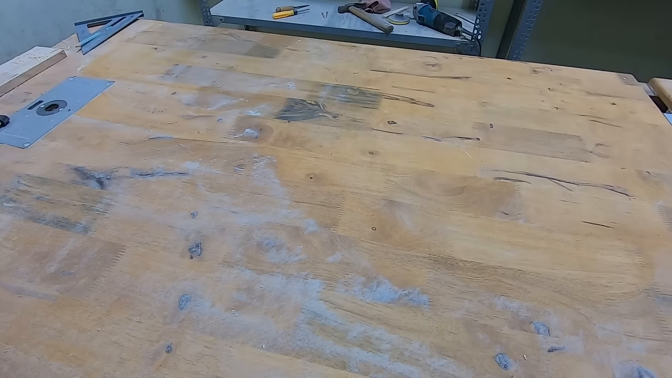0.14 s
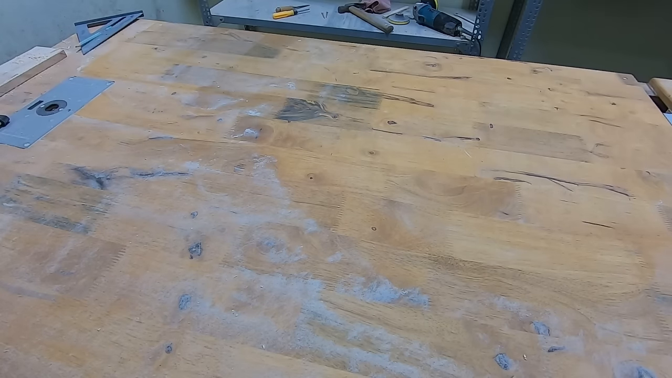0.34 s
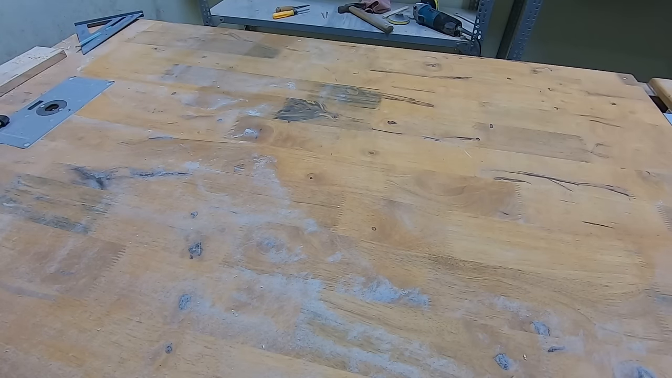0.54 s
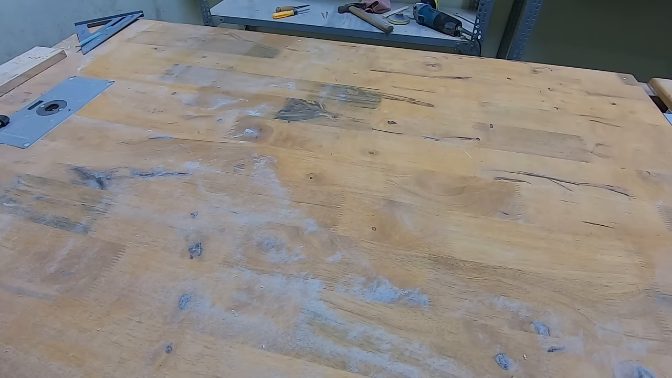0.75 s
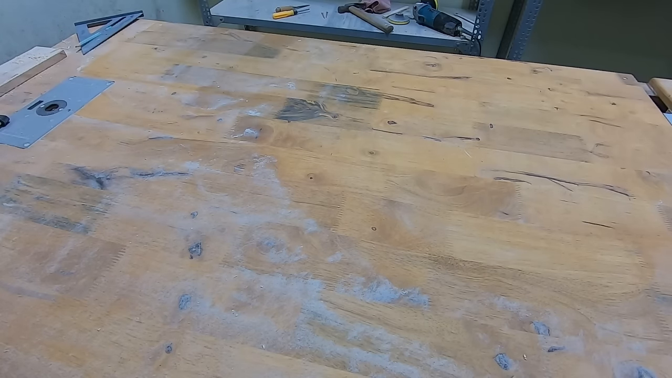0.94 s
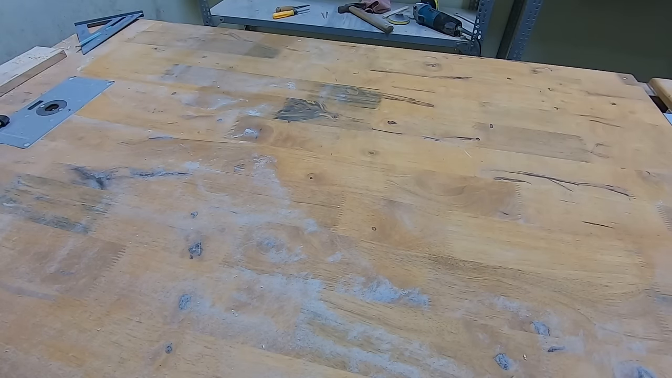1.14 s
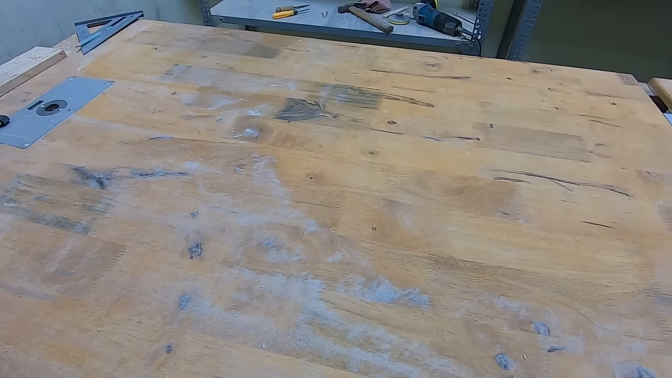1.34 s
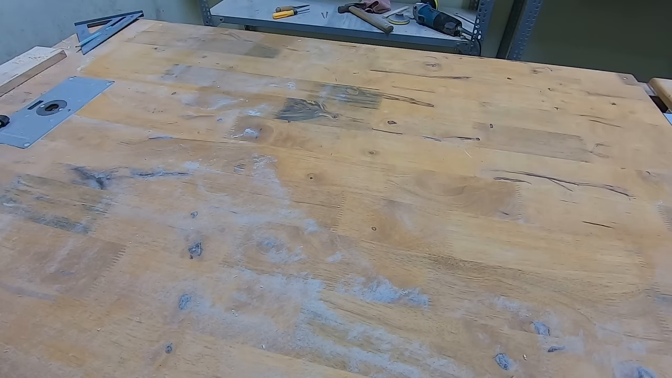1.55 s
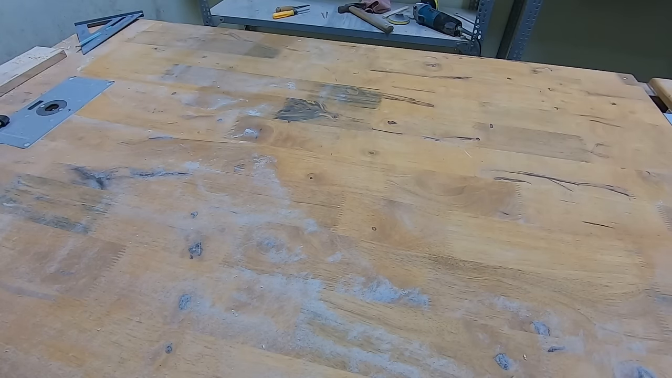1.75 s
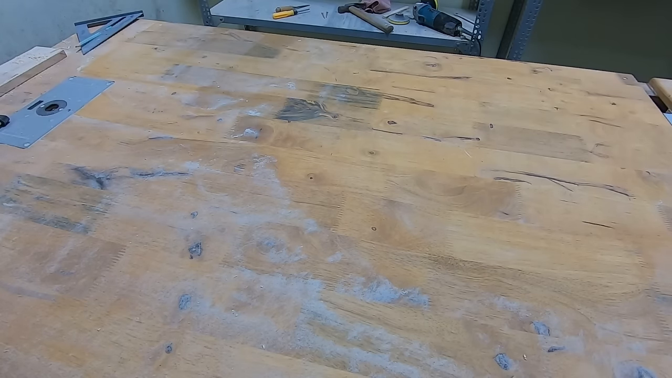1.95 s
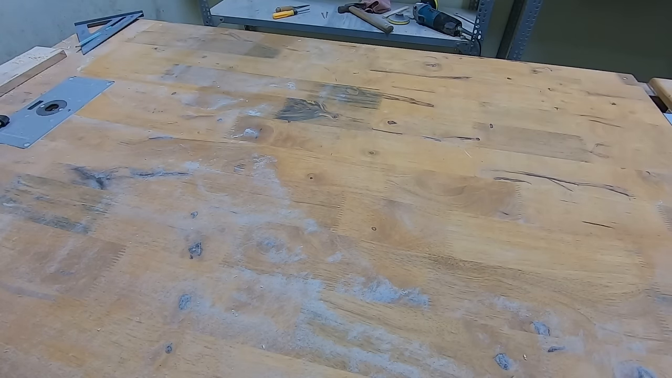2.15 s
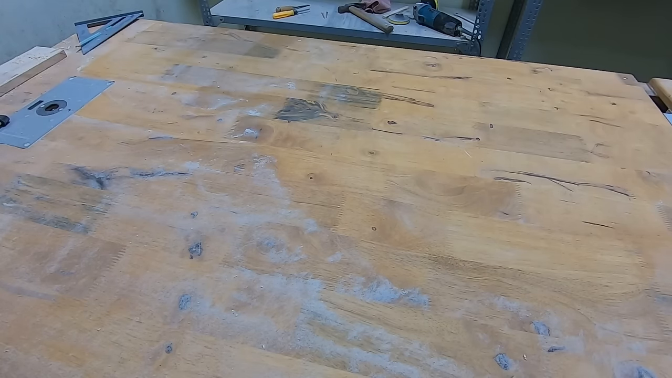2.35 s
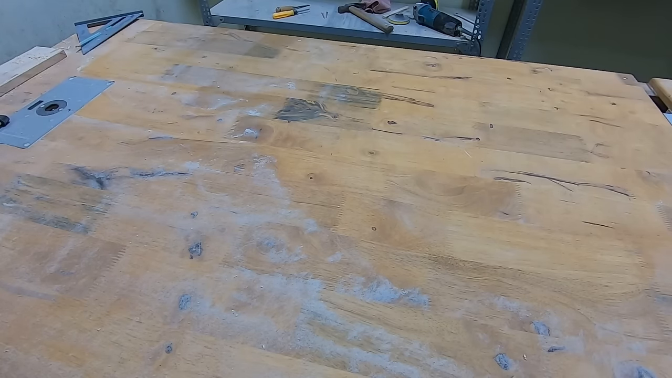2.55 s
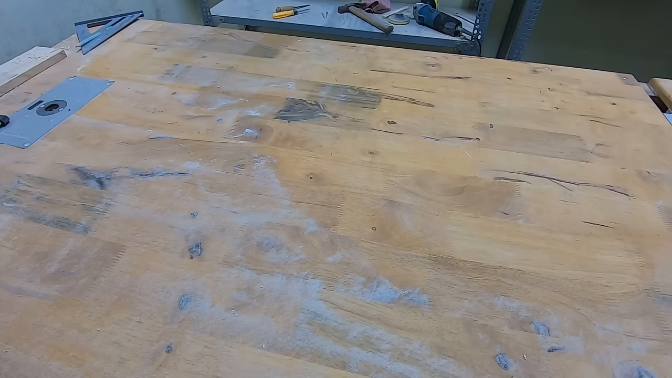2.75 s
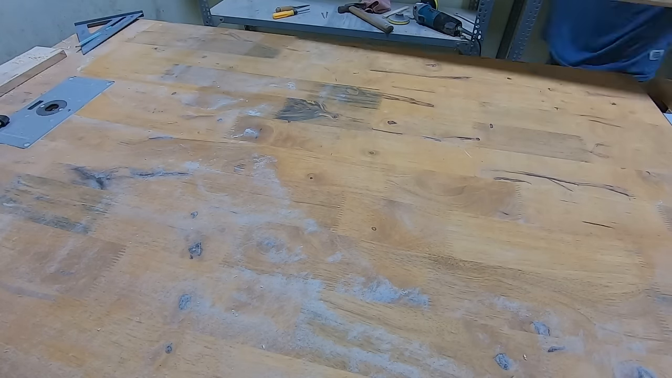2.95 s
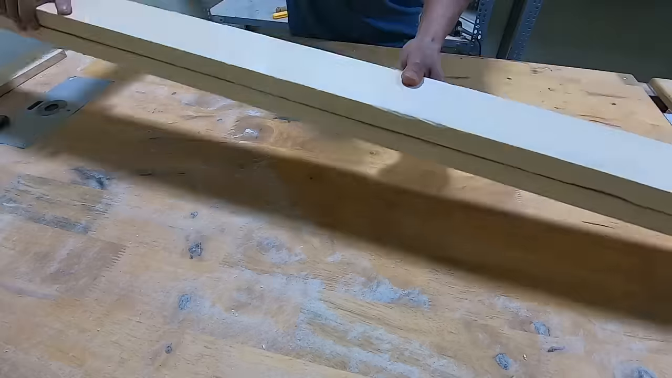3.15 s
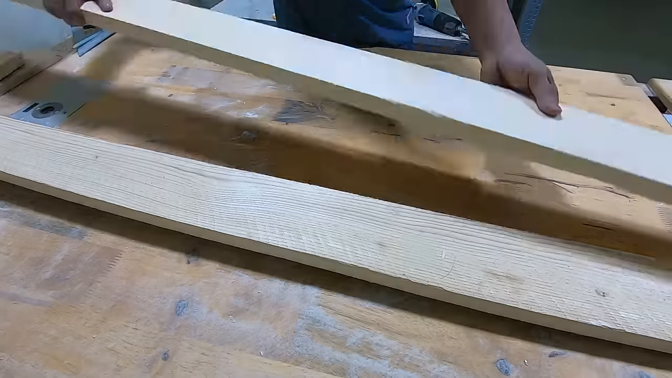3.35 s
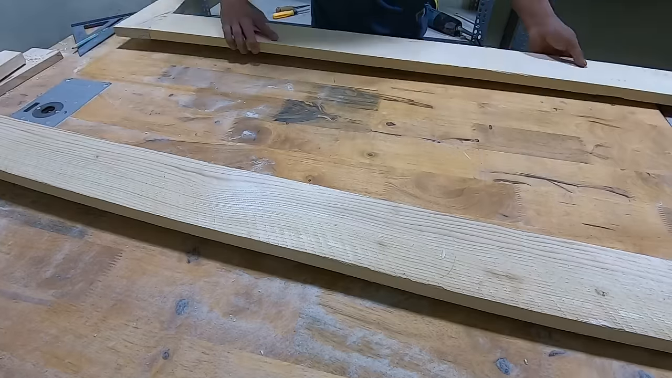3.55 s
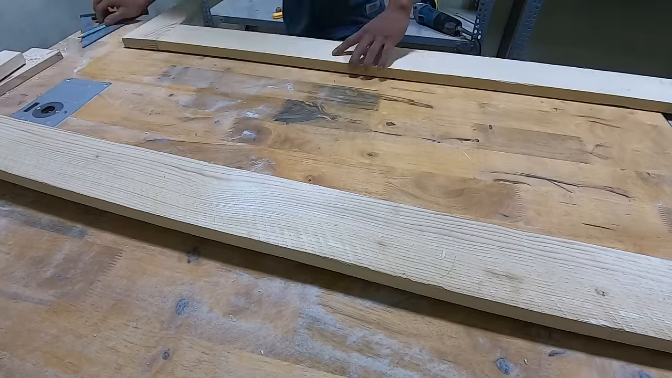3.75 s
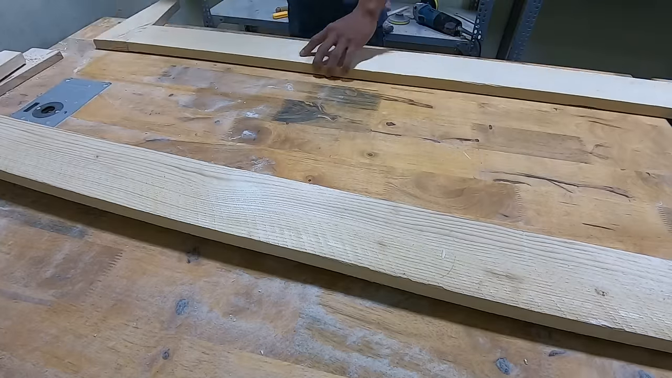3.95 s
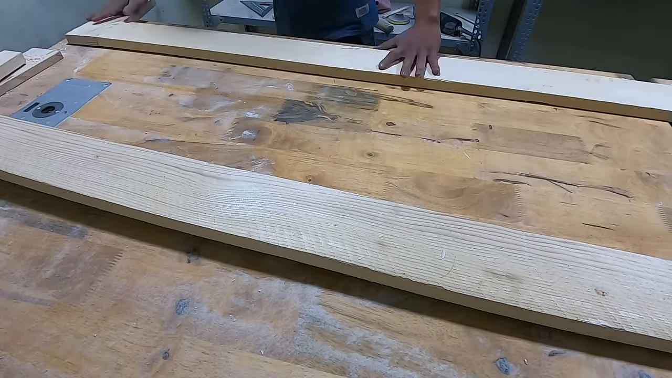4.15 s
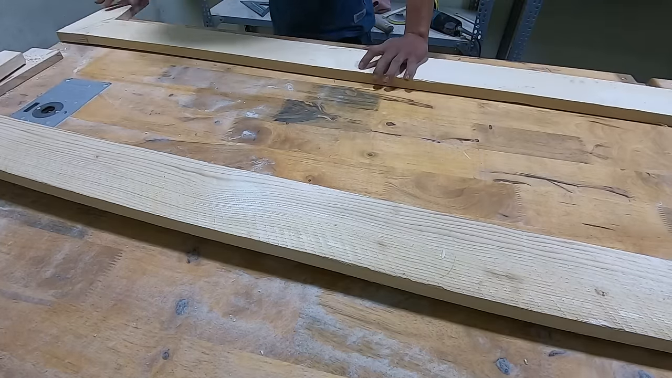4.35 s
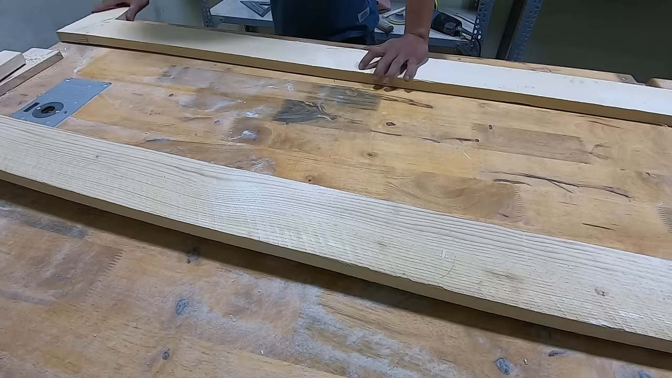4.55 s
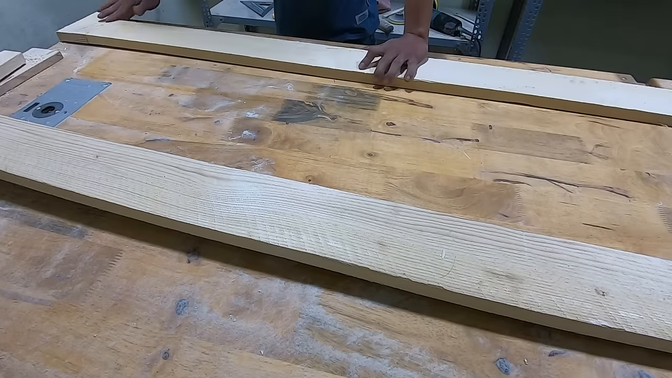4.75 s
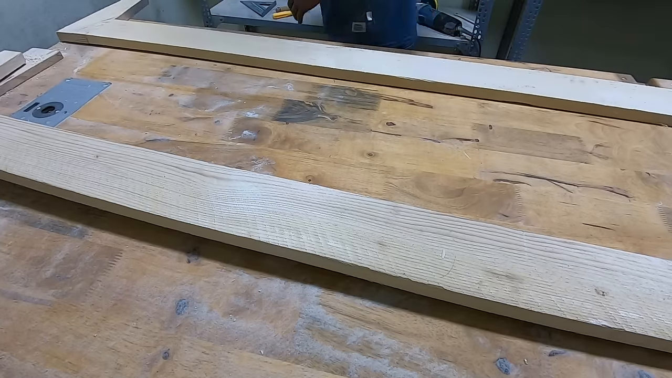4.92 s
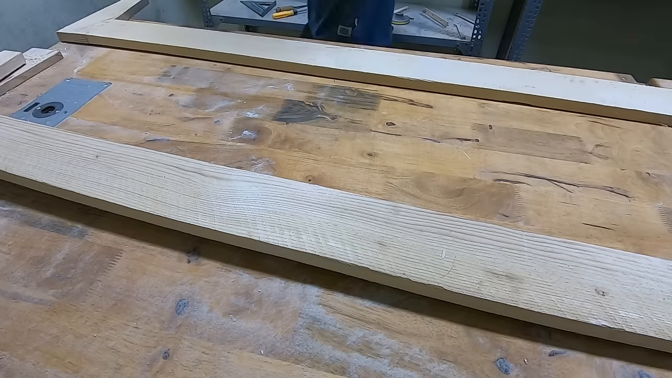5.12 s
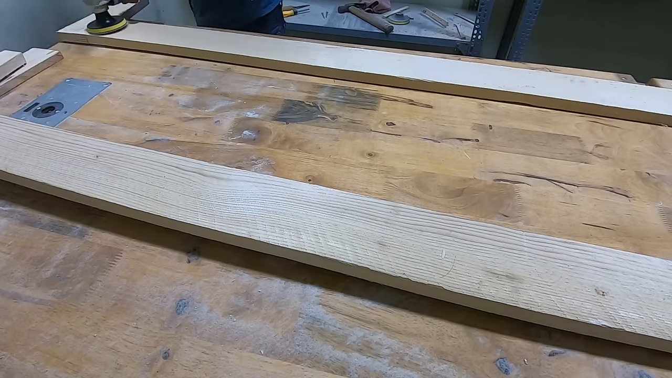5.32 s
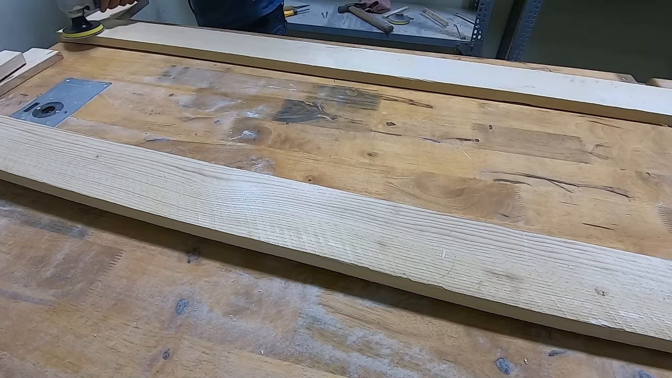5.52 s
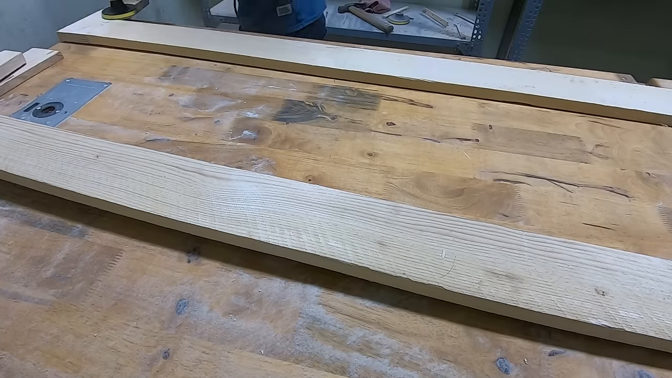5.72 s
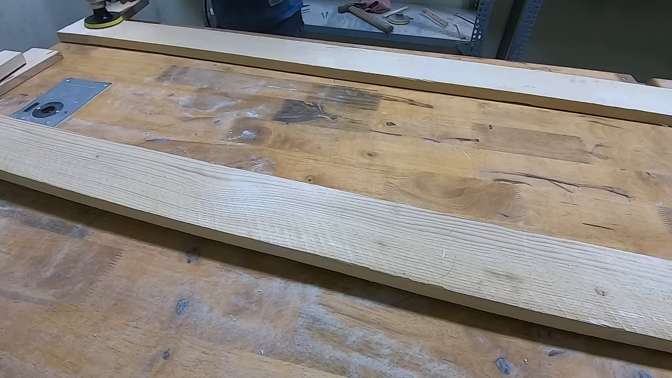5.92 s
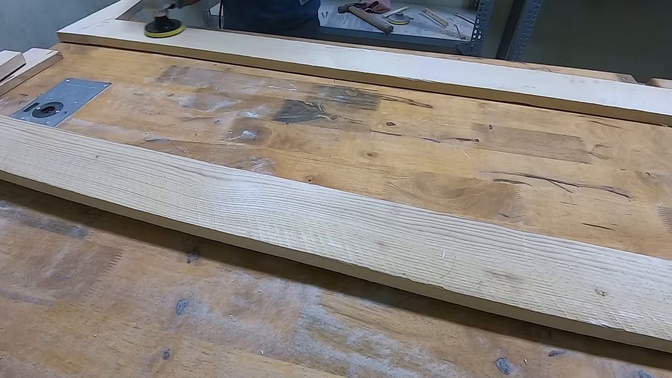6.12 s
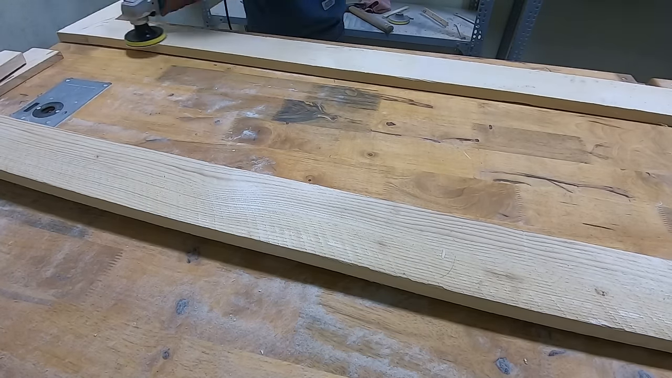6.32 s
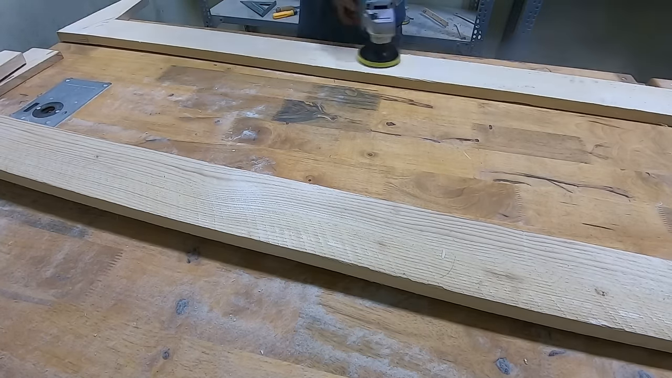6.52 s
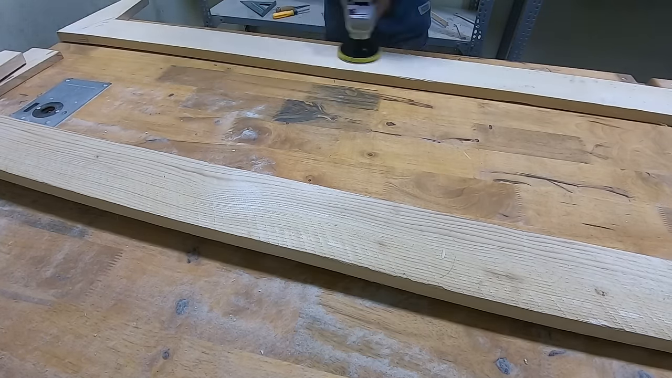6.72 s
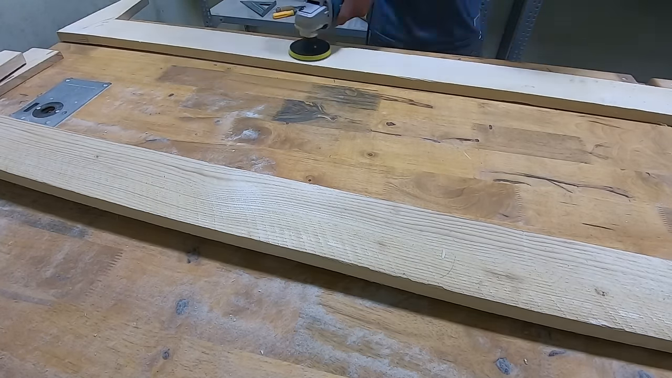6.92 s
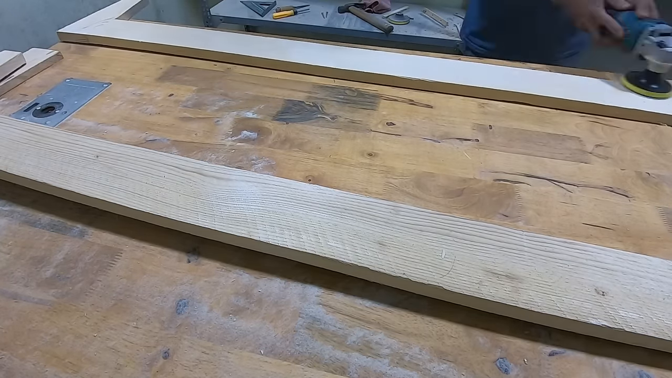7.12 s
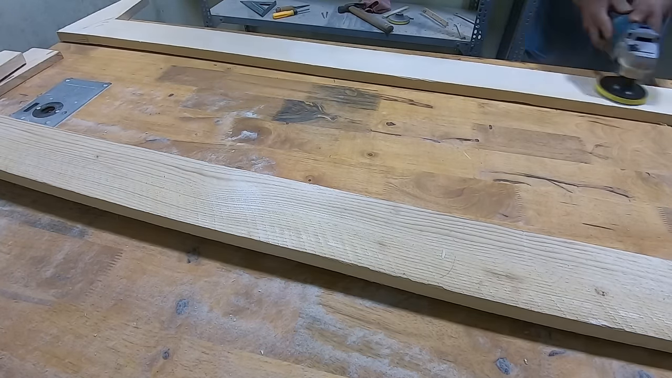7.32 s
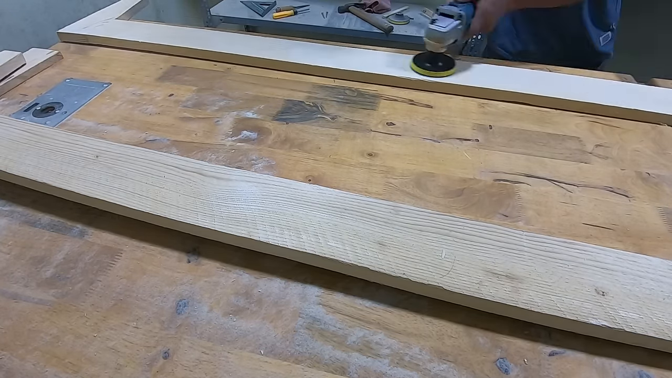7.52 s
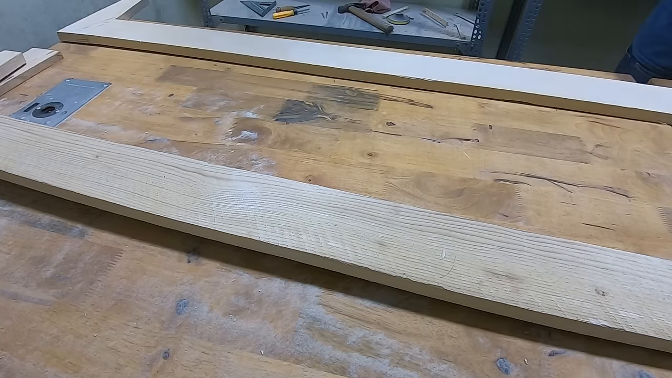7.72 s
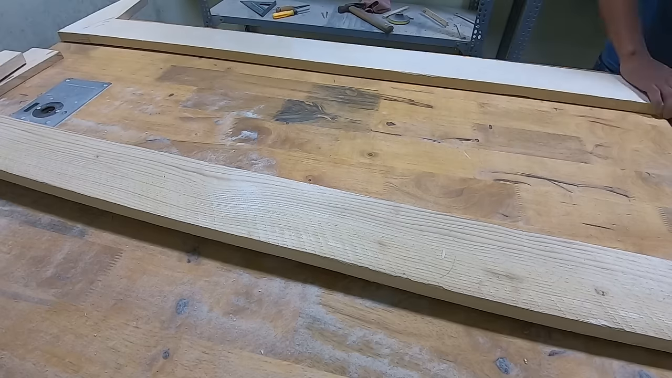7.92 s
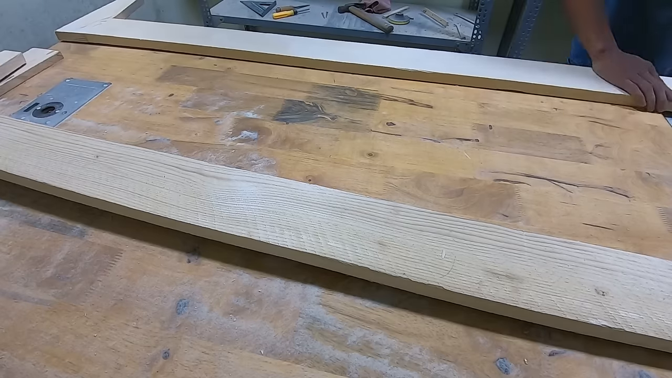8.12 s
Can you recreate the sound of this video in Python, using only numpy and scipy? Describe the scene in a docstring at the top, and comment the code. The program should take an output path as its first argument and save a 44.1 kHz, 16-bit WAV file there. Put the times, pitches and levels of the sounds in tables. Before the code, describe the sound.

In a small workshop heard in fast motion, tools land and drag on a steel shelf with bright, splashy clanks while feet patter quickly. Wooden boards then slide and knock onto a bench with hard, ringing raps. After a brief lull an electric disc sander starts with a puff of air, dips once, and whines gritty and high until the end. Close stereo microphones, short room resonance.

```python
"""Tools clatter on a steel shelf in a small workshop in fast motion, everything quick and high-pitched.
Each blow is a burst of noise through the steel's resonances; feet patter and ring the room's fixed low modes.
Boards knock together on the bench as ringing wood; then a disc sander starts, bogs down once and whines
along a board: a pitched shaft with overtones, rushing air, grit and a shaken bench.
Heard at two close microphone ports that differ in level, phase and how alike their noise is."""
import sys
import numpy as np
from scipy import signal
from scipy.fft import rfft, irfft, next_fast_len
from scipy.io import wavfile
from scipy.ndimage import uniform_filter1d, map_coordinates

SR = 44100
rng = np.random.default_rng(int(sys.argv[2]) if len(sys.argv) > 2 else 0)


def generate_wav(signal):
    """Clip the signal to [-1, 1] and save it as 16-bit WAV at the path in sys.argv[1]."""
    frames = np.transpose(np.atleast_2d(signal))
    scaled = np.clip(frames, -1, 1) * 32767
    pcm = np.round(scaled).astype(np.int16)
    wavfile.write(sys.argv[1], SR, pcm)


N = 360297  # samples, about 8.2 s


def amp(db):
    """Amplitude ratio of a level in dB."""
    return 10 ** (np.asarray(db) / 20)


def unit(x):
    """x scaled to an rms of 1."""
    return x / np.sqrt(np.mean(np.abs(x) ** 2) + 1e-20)


def along(points, hz):
    """Read (freq_hz, value) points on a log frequency axis."""
    point_hz, value = np.transpose(points)
    return np.interp(np.log(hz + 1), np.log(point_hz + 1), value)


def curves(rows):
    """One value per sample for each column after the time; the end values hold."""
    s, *columns = np.transpose(rows)
    return [np.interp(np.arange(N) / SR, s, column) for column in columns]


def wobble(rate):
    """A smooth random curve, rate knots a second."""
    knots = rng.standard_normal(int(N * rate / SR) + 4)
    return map_coordinates(knots, [np.arange(N) * rate / SR])


def filtered(x, response):
    """x times a complex response of frequency."""
    size = next_fast_len(N + SR // 8, True)
    hz = np.fft.rfftfreq(size, 1 / SR)
    return irfft(rfft(x, size) * response(hz), size)[..., :N]


def shaped(spectrum):
    """Response read from (freq_hz, level_db) points."""
    return lambda hz: amp(along(spectrum, hz))


def resonant(peaks):
    """Response of (freq_hz, width_hz, level_db) resonances, added with alternating sign."""
    def response(hz):
        total = 0
        for k, (peak_hz, width_hz, db) in enumerate(peaks):
            band = 1j * hz * width_hz
            total = total + (-1) ** k * amp(db) * band / (peak_hz ** 2 - hz ** 2 + band)
        return total
    return response


def patched(pair, depth_db, size, wide, long):
    """Random gain in patches, wide bins by long frames of a size-sample window."""
    z = signal.stft(pair, nperseg=size)[2]
    field = rng.standard_normal(z.shape[1:])
    field = uniform_filter1d(field, size=wide, axis=0)
    field = uniform_filter1d(field, size=long, axis=1)
    return signal.istft(z * amp(depth_db * unit(field)), nperseg=size)[1][:, :N]


# How alike noise is at the two ports: freq_hz, likeness (1 = identical)
LIKENESS = [(60, .7), (150, 0.6), (300, 0.48), (600, 0.94), (1200, 0.97), (2400, 1), (4000, 0.78),
            (6000, 0.16), (15000, 0.17)]


def noise(response, patchy_db=0, streaky_db=0):
    """Stereo noise, mid rms 1: broad patches of gain, and streaks where room reflections add up for a moment."""
    pair = rng.standard_normal((2, N))
    if patchy_db:
        pair = patched(pair, patchy_db, size=256, wide=2, long=10)
    if streaky_db:
        pair = patched(pair, streaky_db, size=1024, wide=2, long=14)

    def mid_and_side(hz):
        turn = np.arccos(np.clip(along(LIKENESS, hz), -1, 1)) / 2
        return response(hz) * np.array([np.cos(turn), np.sin(turn)])

    mid, side = filtered(pair, mid_and_side)
    return np.array([mid + side, mid - side]) / np.std(mid)


def bursts(times, db, t60, rise, crack_db=-30):
    """Envelope of blows, summed as power: a crack, a quick rise, then the room's decay."""
    power, t = np.zeros(N + SR), np.arange(SR // 3) / SR
    crack = amp(crack_db) * t / 0.00068 * np.exp(1 - t / 0.00063)
    for s, level_db, fall_s, rise_s in zip(times, db, t60, rise):
        swell = amp(-60 * t / abs(fall_s)) * (1 - np.exp(-t / abs(rise_s)))
        power[round(s * SR):][:len(t)] += (amp(level_db) * (swell + crack)) ** 2
    return np.sqrt(power[:N])


def rung(times, db, modes, spread_db, attack_s=0.003):
    """Every blow rings the (freq_hz, level_db, t60_s) modes at new strengths."""
    out, t = np.zeros(N + SR), np.arange(SR // 8) / SR
    hz, level_db, t60 = np.transpose(modes)[:, :, None]
    shapes = amp(level_db - 60 * t / t60) * np.sin(2 * np.pi * hz * t) * (1 - np.exp(-t / attack_s))
    spread = rng.normal(0, spread_db, (len(times), len(modes)))
    for s, blow_db, luck_db in zip(times, db, spread):
        out[round(s * SR):][:len(t)] += amp(blow_db + luck_db) @ shapes
    return out[:N]


# Short tones: start_s, length_s, pitch_hz, level_db
SHORT_TONES = [(.0, 0.046, 1870, -59), (.05, 0.2, 1297, -58.5), (.26, 0.046, 1860, -56),
               (.47, 0.039, 1860, -59), (.7, 0.07, 1850, -58), (1.18, 0.074, 2580, -44.5),
               (1.19, 0.089, 1910, -55.5), (1.262, 0.036, 2670, -48), (1.29, 0.18, 1590, -52),
               (1.93, 0.077, 1960, -53), (2.58, 0.083, 1870, -56), (2.82, 0.086, 1860, -56.5),
               (3.0, 0.038, 1610, -54), (3.06, .08, 1840, -56), (4.89, 0.085, 1854, -46.5),
               (5.12, 0.049, 1850, -47.5), (5.44, 0.06, 568, -39)]


def tones():
    """Faint hums that swell and fade at one pitch, a little unsteady in phase and level."""
    out, drift = np.zeros(N), .5 * wobble(90)
    for s, length, hz, db in SHORT_TONES:
        t = np.arange(round(length * SR)) / SR
        start = max(round(s * SR), 0)
        swell = abs(np.sin(np.pi * t / length)) ** 0.8
        out[start:][:len(t)] += amp(db) * swell * np.sin(2 * np.pi * hz * t + drift[start:][:len(t)])
    return out * amp(2.6 * wobble(60))


# Room drone spectrum: freq_hz, level_db (per Hz)
DRONE_SPECTRUM = [(25, -46), (100, -22.5), (140, -22), (200, -14.5), (320, -22.5), (400, -17.5), (600, -19),
                  (800, -22), (1000, -10), (1300, 1), (1550, -7), (1860, -5), (2100, -14.5), (2350, -7),
                  (2900, -22), (4000, -47), (6000, -70)]
# Scuffing of hands and clothes, before a small trim: start_s, level_db
HANDLING = [(0, -59.5), (.53, -57.5), (.9, -64), (1.2, -62), (1.4, -72), (1.6, -61.5), (1.75, -55.5),
            (1.93, -49), (2.08, -74), (2.3, -60.5), (2.73, -60), (3.0, -54.5), (3.2, -59.5), (3.6, -59.5),
            (3.8, -56.5), (4.04, -53), (4.2, -59), (5.3, -59.5)]
# Scuffing spectrum: freq_hz, level_db (per Hz)
SCUFF_SPECTRUM = [(1470, -35), (2500, -3.5), (3940, -7.5), (5370, -3), (8200, -4.5), (11800, -3.5),
                  (15800, -6)]
# Boards slid on the bench: start_s, level_db
BOARD_SLIDES = [(2.8, -65), (3.0, -62), (3.6, -74), (3.76, -53), (4.04, -59), (4.27, -63), (4.35, -76)]
# Resonances of the boards, slid or knocked: freq_hz, width_hz, level_db
BOARD_MODES = [(818, 38, -9.5), (1010, 88, -2.5), (1310, 69, 6), (1600, 140, 1), (1864, 96, 4),
               (1973, 120, 12.5), (2320, 270, 4.5), (2920, 215, 3.5), (3200, 430, -0.5), (4780, 830, -6.5)]


def bustle():
    """The room's drone, the scuffing of hands and clothes, and boards sliding in gritty jerks."""
    drone_db = -61 + wobble(3.91) + 1.7 * wobble(40)
    drone = amp(drone_db) * noise(shaped(DRONE_SPECTRUM), streaky_db=3)
    slide_db = curves(BOARD_SLIDES)[0] + 5.3 * wobble(60)
    slide = amp(slide_db) * noise(resonant(BOARD_MODES), streaky_db=4.5)
    scuff_db = curves(HANDLING)[0] + 0.35 + 1.27 * wobble(30.3)
    return drone + slide + amp(scuff_db) * noise(shaped(SCUFF_SPECTRUM))


# Clearest footfalls, before the heel, sole and toe offsets: start_s, level_db
FOOTFALLS = [(0.203, -52.5), (0.353, -50), (0.527, -50), (.671, -55), (.717, -56), (.773, -55),
             (.945, -49.5), (1.023, -55), (1.114, -53), (1.244, -56), (1.564, -56), (1.634, -42.5),
             (1.858, -46), (2.078, -55), (2.196, -55), (2.41, -50.5), (2.503, -45), (2.535, -46.5),
             (2.591, -45.5), (2.649, -44), (2.737, -45), (2.812, -44), (2.825, -40.5), (2.883, -44),
             (2.973, -40.5), (3.002, -39.5), (3.059, -45.5), (3.117, -43), (3.219, -42.5), (3.441, -44),
             (3.484, -44), (3.587, -40), (3.762, -39), (3.81, -43), (3.908, -43), (3.952, -44),
             (3.994, -43.5), (4.055, -42.5), (4.231, -45.5), (4.29, -46.5), (4.364, -39.5), (4.405, -43.5)]
# Upper level of the lighter footfalls between: start_s, level_db
LIGHT_FOOTFALLS = [(0, -52), (.5, -54.5), (1.3, -56.5), (2.3, -56.5), (3.2, -58), (3.7, -49), (4.35, -53),
                   (4.5, -57), (5.3, -56)]
# Soft low bumps, relative levels: start_s, level_db, pitch_hz
LOW_BUMPS = [(.072, -63, 209), (.16, -61, 213), (.247, -52, 216), (.475, -65, 221), (.521, -56, 199),
             (.53, -66, 130), (2.869, -65, 220), (3.012, -62, 225), (3.203, -46.5, 240),
             (3.247, -49.5, 227), (3.28, -65, 130), (3.304, -54, 215), (3.681, -55, 131), (3.7, -49, 196),
             (3.76, -64, 210), (4.239, -63, 212), (4.376, -63, 225)]
# Room modes rung by feet and knocks: freq_hz, level_db, t60_s
ROOM_MODES = [(419, -6.5, 0.044), (490, -7, 0.018), (576, 4, 0.027), (710, -20, 0.042), (816, -10, 0.033)]
PATTER_GAP_S, PATTER_SCATTER = .078, .4  # scatter is a share of the gap


def steps():
    """Heel, sole, toe: each rings the low room modes; lighter steps keep a loose pace; bumps boom deeper."""
    beats = np.arange(0, 5.25, PATTER_GAP_S)
    luck = rng.random((len(beats), 2))
    light_s = beats + PATTER_GAP_S * PATTER_SCATTER * luck[:, 0]
    light_db = np.interp(light_s, *np.transpose(LIGHT_FOOTFALLS)) - 6 * luck[:, 1]
    s, db = np.hstack([np.transpose(FOOTFALLS), [light_s, light_db]])
    feet = np.zeros(N)
    for late_s, part_db in [(0, 2), (.016, -1), (.032, -7.5)]:  # heel, sole, toe
        feet += rung(s + late_s, db + part_db, ROOM_MODES, spread_db=3.0)
    bumps, t = np.zeros(N + SR), np.arange(SR // 8) / SR
    for bump_s, bump_db, hz in LOW_BUMPS:
        decay = amp(bump_db + 11.5 - 60 * t / 0.068)
        bumps[round(bump_s * SR):][:len(t)] += decay * np.sin(2 * np.pi * hz * t) * (1 - np.exp(-t / 0.0066))
    return feet + bumps[:N]


# Tools landing on the shelf (quick rise) or dragged over it (slow rise); body and top are relative to level:
# start_s, level_db, body_db, top_db, t60_s, rise_s
TOOL_BLOWS = [(0.061, -48, -1, -6, .18, 0.0033), (.0832, -38, -12, -13, 0.13, .011),
              (.2323, -42, -1.5, -3, 0.16, .0035), (0.327, -18.5, -4.5, -16, 0.1, 0.0022),
              (.345, -22, -12, -1.5, .11, 0.0024), (.5227, -43, 3, -20, .062, .003),
              (.5446, -23.5, -12, -9, .11, 0.0011), (.7644, -38, -10, -11, 0.089, .01),
              (.851, -39.5, -10.5, -24, 0.15, 0.0029), (0.97, -39.5, -14.5, -22, 0.26, .002),
              (.999, -26, -10, -23, 0.12, .012), (1.0194, -20.5, -14, -37, 0.11, 0.0094),
              (1.115, -18.5, -25.5, -8, 0.11, .0012), (1.1794, -38, -20, 3, .16, .012),
              (1.2044, -31, -20, -6, 0.31, 0.011), (1.259, -16.5, -24, -7.5, .12, 0.01),
              (1.369, -37.5, 1.5, -27, 0.13, .0024), (1.5125, -41, -33, -24, 0.1, 0.0078),
              (1.6057, -42, -8, 1, 0.095, 0.0024), (1.6283, -13, -19, -7.5, 0.2, 0.0019),
              (1.6464, -12, -35, -15, 0.12, .003), (1.687, -10.5, -24.5, -12, .16, 0.0055),
              (1.8038, -32, -5, -27, 0.11, .012), (1.8505, -13.5, -18.5, -5, 0.11, 0.00092),
              (1.863, -15.5, -40, -10, 0.15, .0012), (1.9494, -36.5, -15, -7, .39, 0.018),
              (2.0247, -19.5, -22, -8, .15, 0.016), (2.388, -49, -3.5, 4.5, 0.13, 0.0027),
              (2.447, -30, -16, -14, 0.12, .0018), (4.877, -49.5, 0.5, 10, .21, .014)]
# Resonances of the steel shelf: freq_hz, width_hz, level_db
SHELF_MODES = [(3730, 27, -17), (5030, 660, 4.5), (6270, 220, 4), (6760, 160, 6), (7830, 270, 5),
               (9030, 350, 11.5), (9110, 1160, 5), (9270, 430, 3)]
# The shelf's top end: freq_hz, level_db (per Hz)
SHELF_SHEEN = [(7000, -61.5), (10000, -2), (11200, 0), (13500, -4), (15800, -8)]


def clatter():
    """Tools land and drag on sheet steel: a wash in its resonances, a sheen above, a shorter body below."""
    s, db, body_db, top_db, t60, rise = np.transpose(TOOL_BLOWS)
    tilt = [(1500, -20.0), (4000, 1.5), (9500, 3.0), (12000, -6), (16000, -40)]
    body_spectrum = [(60, -90), (250, -43), (700, -15.5), (1200, -4.0), (1860, 3), (2600, -1.5), (3500, 0),
                     (6000, -10)]
    bright = lambda hz: (resonant(SHELF_MODES)(hz) + amp(-7.0)) * shaped(tilt)(hz)
    wash = bursts(s, db - 8.5, t60, rise) * noise(bright, patchy_db=2.5, streaky_db=4.0)
    sheen = bursts(s, db + top_db - 3.5, 0.93 * t60, rise) * noise(shaped(SHELF_SHEEN))
    body = bursts(s, db + body_db + 1.5, 0.9 * t60, rise) * noise(shaped(body_spectrum), patchy_db=7.5)
    return wash + sheen + body


# Stick-slip on the steel: start_s, length_s, slips_hz, level_db
STEEL_SQUEAKS = [(1.16, 0.071, 610, -56), (2.022, 0.048, 700, -45)]


def squeaks():
    """Regular slips give a stack of overtones, uneven in strength, strongest near 8 kHz."""
    out, k = np.zeros(N), np.arange(5, 24)[:, None]  # overtone numbers
    draws = rng.normal(0, 1, (len(STEEL_SQUEAKS), 2, len(k), 1))
    for (s, length, rate, db), (strength, phase) in zip(STEEL_SQUEAKS, draws):
        t = np.arange(round(length * SR)) / SR
        level_db = 1.4 * strength - 9 * np.log2(k * rate / 8000) ** 2
        stack = np.sum(amp(level_db) * np.sin(2 * np.pi * (k * rate * t + phase)), axis=0)
        out[round(s * SR):][:len(t)] += amp(db) * np.sin(np.pi * t / length) * stack
    return out


# Boards laid down; treble and thud are relative to level: start_s, level_db, treble_db, thud_db, t60_s
BOARD_KNOCKS = [(2.7535, -47, -2, -8, 0.035), (2.8195, -46, -7, -8, 0.068), (2.9283, -43, -20, -23, 0.12),
                (2.9803, -43.5, -4, -6, .19), (3.0168, -44, 4.5, -8, .05), (3.1104, -34.5, 1, -21, .087),
                (3.1993, -19, -12, -21, .11), (3.292, -39.5, -9, -12, 0.073), (3.3041, -22, -1.5, -8, 0.11),
                (3.366, -36.5, -20, -15, 0.067), (3.384, -41.5, -6.5, -18, 0.18),
                (3.5464, -33, -2, -4, 0.11), (3.619, -36, -8.5, -11, 0.11), (3.652, -33, -9, -16, .08),
                (3.6597, -16, -15, -27, 0.059), (3.675, -12, -7, -9, .11), (3.735, -40.5, 0, -7, 0.14),
                (3.8052, -39, -5, -12, .11), (3.826, -34.5, -14, -24, 0.14), (3.8729, -30, -18, -24, .073),
                (3.909, -39, -7, -12, .066), (3.9415, -36.5, -4, -21, 0.13), (3.964, -31, 2, -24, 0.099),
                (3.997, -34.5, -4, -17, 0.18), (4.0357, -37.5, -1.5, -34, .15),
                (4.0643, -34, -0.5, -23, 0.067), (4.1093, -19, -2, -18, 0.3),
                (4.131, -19, -1.5, -29, 0.095), (4.1536, -15.5, -3, -17, .13),
                (4.2688, -45, 1.5, -11, 0.16), (4.5537, -41, -6.5, -44, 0.18),
                (4.679, -32.5, -6.5, -43, 0.14), (5.1284, -48, -24, -24, 0.13),
                (5.1636, -50.5, 0, -16, 0.16)]
# Spectrum of the low thud: freq_hz, level_db (per Hz)
THUD_SPECTRUM = [(40, -75), (90, -43), (130, -29), (240, -21), (340, -23), (480, -3.5), (800, -4),
                 (1200, 3.5), (1600, -63), (2600, -120)]
# Spectrum of the snap: freq_hz, level_db (per Hz)
SNAP_SPECTRUM = [(2060, -33), (3500, -2.5), (5140, 2), (8680, 1.5), (10100, -0.5), (14400, -3), (15800, -6)]


def knocks():
    """Wood on wood: board resonances, a snap above them, a thud below that sets the room booming."""
    s, db, treble_db, thud_db, t60 = np.transpose(BOARD_KNOCKS)
    rise = np.full(len(s), 0.0021)  # seconds
    board = bursts(s, db - 5, t60, rise, crack_db=-6.5) * noise(resonant(BOARD_MODES), streaky_db=4)
    snap_envelope = bursts(s, db + treble_db - 1, 0.96 * t60, rise, crack_db=-4.5)
    snap = snap_envelope * noise(shaped(SNAP_SPECTRUM), patchy_db=-1.5)
    boom = rung(s + 0.00385, db + thud_db - 1.5, ROOM_MODES, spread_db=1.5)
    # a resonance's width sets how long it rings freely
    free_modes = [(hz, top_db, np.log(1000) / (np.pi * width)) for hz, width, top_db in BOARD_MODES]
    ring = rung(s, db - 17.5, free_modes, spread_db=2.5, attack_s=0.00037)
    thud = bursts(s, db + thud_db + 1.5, 0.93 * t60, 0.31 * rise) * noise(shaped(THUD_SPECTRUM))
    return board + ring + snap + boom + thud


def line(turn, db, rough, rate):
    """A sine whose rough share is scattered into a noisy skirt about rate Hz wide."""
    skirt = wobble(rate) * np.sin(turn) + wobble(rate) * np.cos(turn)
    return amp(db) * (np.sqrt(2 - 2 * rough) * np.sin(turn) + np.sqrt(rough) * unit(skirt))


# Sander shaft, before its small wobbles: start_s, pitch_hz, level_db
SHAFT_WHINE = [(5.305, 930, -47), (5.358, 1302, -44.5), (5.385, 1340, -39), (5.44, 1270, -36.5),
               (5.495, 850, -44), (5.52, 900, -49), (5.552, 1266, -54), (5.582, 1334, -31.5),
               (5.707, 1250, -42.5), (5.922, 1330, -34.5), (5.976, 1250, -36.5), (6.126, 1180, -39.5),
               (6.201, 1246, -36.5), (6.261, 1160, -39.5), (6.376, 1155, -36.5), (6.41, 1202, -40),
               (6.525, 1236, -39), (6.665, 1150, -39.5), (6.8, 1165, -34.5), (6.884, 1210, -41.5),
               (6.974, 1110, -42), (7.03, 1155, -42), (7.124, 1095, -39.5), (7.2, 1160, -33),
               (7.268, 1110, -31), (7.313, 1146, -36), (7.403, 1075, -33), (7.443, 1140, -35.5),
               (7.593, 1190, -42.5), (7.688, 1102, -32), (7.767, 1206, -33), (7.902, 1210, -37),
               (7.988, 1420, -35), (8.062, 1198, -29), (8.127, 1126, -37), (8.17, 1142, -31)]
# Disc pressed on the board: start_s, contact_db
DISC_CONTACT = [(5.3, -20), (5.32, -4.5), (5.38, -13), (5.43, -7), (5.465, 2), (5.53, -6.5), (5.56, -9),
                (5.585, -3), (5.88, -1), (6.3, 0), (7.0, -1), (7.58, -2.5), (7.63, -4), (7.7, 0.5),
                (7.78, -4.5), (7.86, -6), (7.93, -6.5), (7.96, -15), (8.04, -2.5), (8.17, -4.5)]
# Overtones and gear lines, before the housing's lift: multiple of the shaft, level_db, rough share, flicker_db
SHAFT_LINES = [(2, -53.5, .9, 4.5), (2.865, -47, 0.71, 4.5), (4, -58.5, 1.2, 5), (5, -53.5, 1.3, 1),
               (5.73, -56, 1.2, -2)]
# Housing resonances that lift the lines crossing them: freq_hz, width_hz, lift_db
HOUSING_MODES = [(2415, 66, 17), (3800, 270, 7)]
# Spectrum of the rushing air: freq_hz, level_db (per Hz)
AIR_SPECTRUM = [(2000, -41), (3000, -16.5), (4000, -10.5), (4440, -6.5), (5090, -8), (6160, -3),
                (7410, -4.5), (9350, -5), (13000, 1), (15200, -0.5), (15800, -0.5)]
# Resonances of the grit: freq_hz, width_hz, level_db
GRIT_MODES = [(1376, 61, 5), (1596, 19, 7.5), (1720, 370, -5), (2045, 113, 1), (2225, 33, 2), (2406, 38, 7),
              (3030, 1100, -7.5), (4470, 1600, -28)]
# Resonances of the bench: freq_hz, width_hz, level_db
BENCH_MODES = [(467, 33, -10.5), (589, 27, -3.5), (804.3, 23.7, 8), (1045, 30, 1)]
# Low rumble that follows the air: freq_hz, level_db (per Hz)
RUMBLE_SPECTRUM = [(15, -46), (25, -12), (60, -11), (215, -14.5), (329, -11), (404, -0.5), (450, -26),
                   (580, -38), (990, -120)]
START_S, START_PUFF_DB, START_PUFF_S = 5.296, 14.5, 0.024
CRUISE_HZ, SLOW_HZ = 1189, 1065  # speed at which AIR_DB holds; below the slow speed air falls no further
AIR_DB, AIR_POWER = -30.5, 2.23  # air amplitude grows as this power of speed
BENCH_DB, BENCH_GROWS, GRIT_DB, GRIT_GROWS = -45.5, 1.63, -42, 0.57  # at 0 dB contact; dB per dB of contact
DAMPING = 0.55  # share of the housing's lift lost in a hard bite


def sander():
    """Shaft whine with overtones and gear lines, rougher the harder the disc bites; air, grit, shaken bench."""
    hz, whine_db = curves(SHAFT_WHINE)
    contact_db, = curves(DISC_CONTACT)
    since = np.arange(N) / SR - START_S
    hz = hz * (1 + 0.00716 * wobble(45))
    turn = 2 * np.pi * np.cumsum(hz) / SR
    bite = np.clip(0.67 + contact_db / 16, .25, 1)
    slow_db = np.minimum(0, (hz - 1090) / 12)  # the upper lines die away when the shaft is slow
    whine = line(turn, whine_db + 1.2 * bite * wobble(25), 0.69 * bite, rate=140)
    for multiple, db, rough, flicker_db in SHAFT_LINES:
        lift_db = 0
        for peak_hz, width, top_db in HOUSING_MODES:
            lift_db = lift_db + top_db / (1 + (2 * (multiple * hz - peak_hz) / width) ** 2)
        lift_db = lift_db * (1 - DAMPING * bite)
        flicker = flicker_db * (0.53 + 0.41 * bite) * wobble(35)
        whine += line(multiple * turn, db + lift_db + slow_db + flicker, np.clip(rough * bite, 0, 1), rate=130)

    grab = wobble(50)  # uneven contact shakes bench and grit together
    speed_db = 20 * AIR_POWER * np.log10(np.maximum(hz, SLOW_HZ) / CRUISE_HZ)
    air_db = AIR_DB + speed_db + START_PUFF_DB * np.exp(-abs(since) / START_PUFF_S)
    air_sway_db = 0.056 * contact_db + 0.27 * wobble(90) + 0.64 * grab + 0.68 * wobble(17)
    air = amp(air_db + air_sway_db) * noise(shaped(AIR_SPECTRUM), patchy_db=1.5, streaky_db=3.0)
    grit_db = GRIT_DB + GRIT_GROWS * contact_db + 1.8 * grab + 0.89 * wobble(15)
    grit = amp(grit_db) * noise(resonant(GRIT_MODES), streaky_db=3.5)
    bench_db = BENCH_DB + BENCH_GROWS * contact_db + 2.0 * grab + 1.2 * wobble(15)
    bench = amp(bench_db) * noise(resonant(BENCH_MODES))
    rumble = amp(air_db - 42.5 + 1.5 * grab) * noise(shaped(RUMBLE_SPECTRUM))
    fade_in = np.clip(since / 0.014, 0, 1)
    return fade_in * (whine + air + grit + bench + rumble)


# Left port level minus right: freq_hz, level_db
PORT_LEAN = [(300, -1), (2400, -0.3), (4000, -1), (8000, -5.5), (15000, -4.5)]
# Phase by which the left port leads: freq_hz, lead_rad
PORT_LEAD = [(2400, -0.144), (4700, 0.078), (5900, -0.009), (6300, 0.82), (6900, -0.45), (7400, 1.9),
             (8400, 1.3), (10300, 0.091), (12000, -.6), (13300, 0.34), (15500, -.4)]
BLOW_LOW_HZ = 140  # blows carry little below this


def scene():
    """All sources at two close ports: the left is a little softer, most in the treble, and shifted in phase."""
    low_cut = lambda hz: (1j * hz / (BLOW_LOW_HZ + 1j * hz)) ** 2
    blows = filtered(clatter() + knocks(), low_cut)
    here = tones() + bustle() + steps() + blows + squeaks() + sander()

    def ports(hz):
        halves = [.5, -.5]  # left, right
        level = amp(np.outer(halves, along(PORT_LEAN, hz)))
        return level * np.exp(1j * np.outer(halves, along(PORT_LEAD, hz)))

    return filtered(here, ports)


TOP_HZ = 15760


def record(dry):
    """Nothing passes above the band limit."""
    return filtered(dry, lambda hz: hz < TOP_HZ)


dry = scene()
out = record(dry)
generate_wav(out)
```